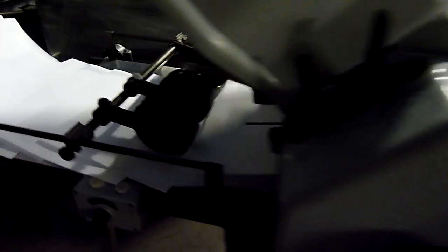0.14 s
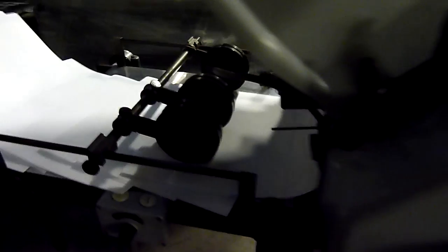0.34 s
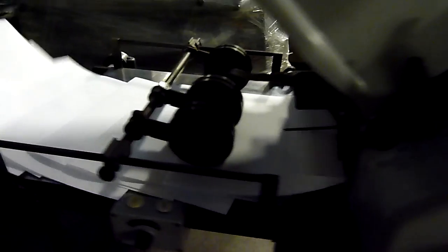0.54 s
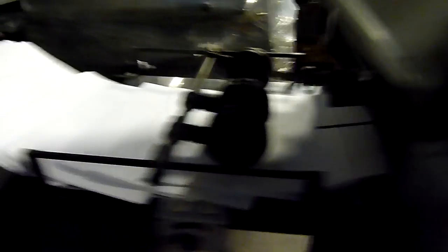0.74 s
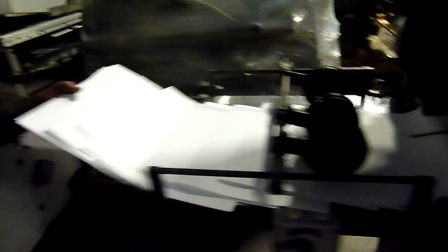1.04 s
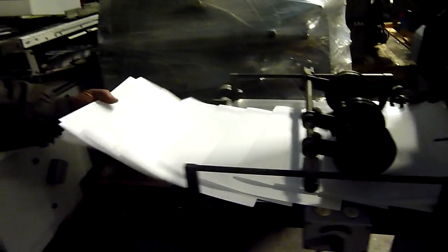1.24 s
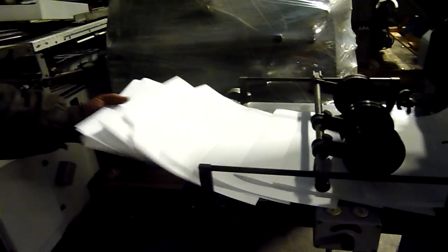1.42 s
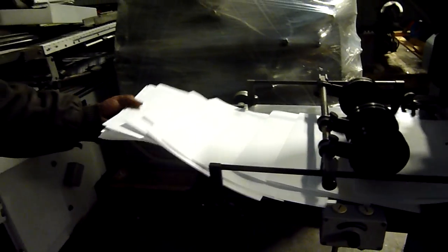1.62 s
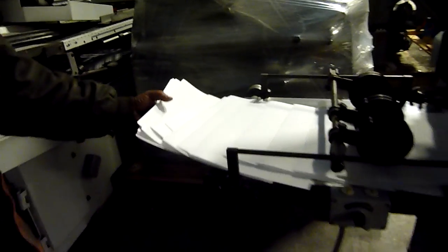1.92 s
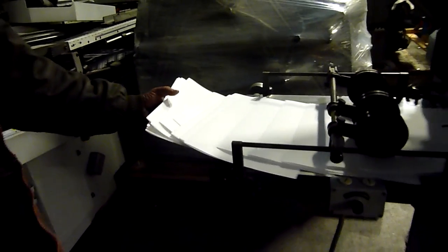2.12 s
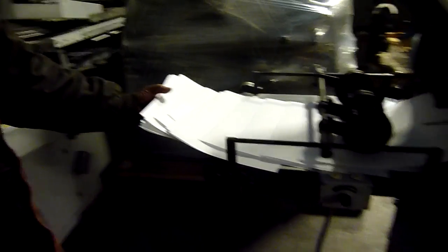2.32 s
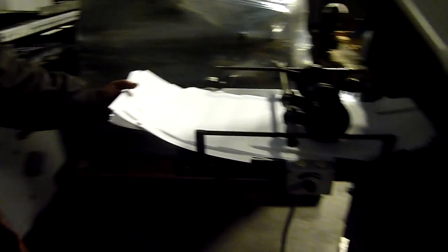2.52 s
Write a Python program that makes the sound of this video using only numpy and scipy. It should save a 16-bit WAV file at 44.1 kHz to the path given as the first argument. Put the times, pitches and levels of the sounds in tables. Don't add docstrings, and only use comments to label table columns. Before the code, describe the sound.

Close up in a workshop, a sheet-feeding folder drones and whirs with rushing air, faint hose whistles and a thin high whine; crisp paper slaps with dull table thuds recur every half second as the listener moves.

```python
import sys
import numpy as np
from scipy import signal
from scipy.fft import rfft, irfft
from scipy.io import wavfile
from scipy.ndimage import uniform_filter1d

SR = 44100
rng = np.random.default_rng(int(sys.argv[2]) if len(sys.argv) > 2 else 0)


def voltage_ratio(decibels):
    exponent = np.asarray(decibels, float) / 20
    return 10 ** exponent


def put_to_file(sound):
    columns = np.atleast_2d(sound).T
    safe = np.clip(columns, -1, 1)
    whole_steps = np.round(safe * 32767)
    wavfile.write(sys.argv[1], SR, whole_steps.astype(np.int16))


N = 117306

SHAFT_HZ, VANES = 24.168, 7
TURN_START_S = .008
MUFFLER_ORDER, MUFFLER_BEND_RAD = 14, -.55
# shaft order, level at start in dB, level at end in dB,
# wander in dB.
HUM_ORDERS = [(6, -55, -58, 2), (7, -41, -41, 1), (11, -39, -49, 1), (13, -30, -49, 1),
              (15, -32, -31.5, .5), (16, -32, -46, 1.5), (20, -35, -44, 1.5), (21, -47, -38, 2),
              (22, -36, -46, 2), (23, -36.5, -40, 1.5), (24, -45, -46, 2), (28, -36, -31.5, 1.5),
              (29, -47, -37, 2), (42, -46, -44, 2), (49, -55, -43, 1.5)]
# time in seconds, level in dB.
PUMP_LOAD = [(0.1, -21.5), (0.48, -22), (0.75, -19), (1.01, -21), (1.37, -21), (1.43, -25.5), (1.55, -19.5),
             (1.56, -21.5), (1.85, -22), (2.41, -22), (2.54, -23), (2.6, -23)]
# shaft order, middle in seconds,
# half length in seconds, level in dB.
ROOM_SWELLS = [
    (42, 1.13, .28, -36),
    (42, 1.66, .1, -40),
    (28, .68, .2, -41),
    (21, 1.3, .5, -43),
    (71, .5, .15, -43),
    (49, 2.5, .12, -43),
    (49, 1.25, .15, -45),
]
# multiple of the vane rate, level in dB.
VANE_WHINE = [(44, -53), (47, -52), (48, -46), (49, -54), (50, -47), (51, -48), (52, -44), (53, -51),
              (54, -52), (55, -57), (56, -53), (61, -58), (62, -54)]
WHINE_DB, WHINE_WANDER_DB, WHINE_PAN_DB, WHINE_BLUR_RAD = -2, 1.8, -1.5, 1.2
# start in seconds, crack in dB,
# ring pitch in Hz, ring in dB, thud in dB.
SHEET_SLAPS = [(.299, -20, 4600, -22, -18), (.338, -26, 3000, -26, -20), (.804, -25, 2200, -24, -22),
               (.8385, -24, 3300, -12, -20), (.8425, -23, 3550, -11, -20), (.8455, -29, 2450, -16, -30),
               (1.032, -30, 3750, -12, -30), (1.3825, -22, 1950, -13, -18), (1.3845, -24, 3750, -15, -30),
               (1.419, -24, 2000, -16, -22), (1.9152, -22, 3550, -11, -24), (1.950, -23, 2900, -15, -24),
               (2.450, -27, 3500, -19, -24), (2.4552, -22, 3750, -7, -26), (2.4556, -30, 4250, -10, -30),
               (2.645, -23, 4700, -18, -22)]
SLAP_T60_S, RING_T60_S, RING_RISE_S, THUD_HZ, THUD_T60_S = .03, .011, .0012, 380, .04
# time in seconds, peak in dB.
FOLD_SNAPS = [
    (.2985, -9),
    (.8055, -14),
    (.8425, -12),
    (1.3832, -7),
    (1.3842, -8),
    (1.4195, -12),
    (1.9168, -10),
    (1.9185, -15),
    (1.9516, -9),
]
# start in seconds, peak in dB, pitch in Hz.
TABLE_BOOMS = [(.06, -25, 165), (.335, -27, 150), (.86, -26, 160), (1.42, -25, 190), (1.465, -26, 200),
               (1.68, -29, 180), (1.95, -19, 185), (1.982, -23, 165), (2.015, -26, 180), (2.49, -27, 160),
               (.8335, -17, 520), (1.9147, -13, 400), (1.9493, -17, 380)]
BOOM_CYCLES, BOOM_RISE_CYCLES = 18, 1
# frequency in Hz, density in dB per Hz.
AIR_SPECTRUM = [(900, -8.5), (1500, -10.5), (2500, -10), (4500, -10), (6500, -8.5), (8000, -11.5),
                (10000, -12), (19000, -23.5)]
AIR_DB = -22.5
# time in seconds, rush change in dB, whine change in dB.
AIR_FLOW = [(0, 1.5, 9), (.35, .5, -11), (.55, 0.3, 8.5), (.85, 1.2, 0), (1.1, -.5, 6), (1.3, 0, 7),
            (1.7, -.5, 9), (2.0, 0, 7.5), (2.2, 0, 8), (2.66, 0.6, 11)]
FIRST_SHEET_S, SHEET_S = .305, .538
SWISH_DB, SWISH_LEAD_S, SWISH_WIDTH_S = 1.1, 0.022, 0.054
# middle in seconds, half length in seconds, frequency in Hz, width in Hz, level in dB.
NOZZLE_JETS = [
    (.17, .35, 5000, 250, -33),
    (.1, .25, 7000, 500, -37),
    (.68, .25, 6000, 300, -33),
    (.9, .5, 5100, 300, -37),
    (1.42, .3, 6000, 250, -34),
    (2.22, .25, 6500, 500, -31),
    (2.62, .1, 6300, 600, -34),
    (1.95, .5, 5400, 300, -39),
    (.55, .2, 1705, 14, -41),
    (2.3, .3, 10500, 2500, -44),
]
# frequency in Hz, width in Hz, level in dB, share of the gusts' swing from 0 to 1.
HOSE_WHISTLES = [(860, 50, -41.5, 0.46), (743.6, 27, -37, 0.1), (202, 29, -44, 0), (1725, 57, -43, 0.15),
                 (294.2, 18, -39, 0)]
HOSE_REF_DB = -32
EVEN_S = .045
# middle in seconds, half length in seconds,
# pitch in Hz, level in dB.
HOSE_GUSTS = [(.07, 0.023, 865.6, -29.5), (0.169, 0.038, 864.4, -29), (0.254, 0.034, 839, -36),
              (0.359, 0.018, 850, -23), (0.489, 0.041, 874, -32.5), (.63, 0.042, 855, -31.5),
              (.77, 0.061, 873.5, -35), (0.863, .045, 845, -30), (0.967, 0.022, 853.6, -38),
              (1.047, .025, 862, -28.5), (1.094, 0.011, 860, -33), (1.16, 0.021, 852, -45),
              (1.24, 0.032, 860, -38), (1.378, 0.022, 848, -32), (1.455, 0.024, 857, -24.5),
              (1.55, 0.039, 853.6, -33), (1.718, 0.046, 867, -37), (1.973, 0.034, 845.5, -37),
              (2.049, 0.031, 854, -27.5), (2.113, 0.023, 864, -29.5), (2.22, 0.02, 866, -31.5),
              (2.33, 0.041, 866, -36), (2.452, .05, 840.4, -38), (2.53, .025, 859, -39),
              (2.602, 0.029, 870.5, -38)]
GUST_OCTAVE_DB, GUST_FLUTTER_RAD = -18, .5
# frequency in Hz, density in dB per Hz.
RUMBLE_SPECTRUM = [(25, -47), (100, -21), (165, -13.5), (255, -10), (420, -7), (700, -5.5), (1000, -13.5),
                   (1500, -24)]
RUMBLE_DB, VANE_PULSE = -27, 0.21
# frequency in Hz, left-right likeness from 0 to 1.
PORT_LIKENESS = [(30, 0.6), (60, 0.77), (130, 1), (300, 0.99), (640, 1), (1400, 0.97), (3000, 0.52),
                 (5500, 0.6), (12000, 0.58)]
# frequency in Hz, lead of the left in radians.
PORT_LEAD = [(30, 0), (2000, .1), (3500, -.9), (5500, -1.6), (8500, -1.4), (11000, -2.7), (15600, -3.1)]
# frequency in Hz, left minus right in dB.
PORT_LEAN = [(60, 1.9), (200, 1.2), (380, .6), (700, .2), (1290, -3.8), (2380, -6.3), (5000, -7.8),
             (8500, -3), (15000, -1.9)]


def shaft():
    return 2 * np.pi * SHAFT_HZ * (np.arange(N) / SR - TURN_START_S)


def pump():
    t = np.arange(N) / SR
    out = voltage_ratio(in_time(PUMP_LOAD)[0]) * np.cos(MUFFLER_ORDER * shaft())
    for order, first_db, last_db, wander_db in HUM_ORDERS:
        level = voltage_ratio(first_db + (last_db - first_db) * t / t[-1] + wander_db * drift(3.0))
        for swell_order, middle_s, half_s, db in ROOM_SWELLS:
            if swell_order == order:
                level = level + voltage_ratio(db) * bell(t - middle_s, half_s) ** 2
        bend = MUFFLER_BEND_RAD * np.clip(order - MUFFLER_ORDER, -1.5, 2) ** 2
        jitter = .12 * (order / MUFFLER_ORDER) ** 2 * drift(2.5)
        out += level * np.cos(order * shaft() + bend + jitter)
    return np.sqrt(2) * out


def whine():
    out = np.zeros((2, N))
    for multiple, db in VANE_WHINE:
        for side in (0, 1):
            start = rng.uniform(0, 2 * np.pi)
            turn = multiple * VANES * shaft() + start + WHINE_BLUR_RAD * drift(3.8)
            out[side] += voltage_ratio(db + WHINE_WANDER_DB * drift(4.5)) * np.cos(turn)
    pan = voltage_ratio([[WHINE_PAN_DB], [-WHINE_PAN_DB]])
    return np.sqrt(2) * out * pan * voltage_ratio(WHINE_DB + in_time(AIR_FLOW)[1])


def slaps():
    out, t = np.zeros((2, N + SR)), np.arange(3000) / SR
    rise = (t / RING_RISE_S) ** 2 / (1 + (t / RING_RISE_S) ** 2)
    slap_decay, ring_decay, thud_decay = [voltage_ratio(-60 * t / t60) for t60 in (SLAP_T60_S, RING_T60_S, THUD_T60_S)]
    crack_band = signal.butter(2, [800, 5600], "band", fs=SR, output="sos")
    thud_band = signal.butter(2, [THUD_HZ / 2, THUD_HZ * 2], "band", fs=SR, output="sos")
    for s, crack_db, ring_hz, ring_db, thud_db in SHEET_SLAPS:
        noise = rng.standard_normal((2, 2, len(t)))
        crack = 2 * voltage_ratio(crack_db) * rms_one(signal.sosfilt(crack_band, noise[0])) * slap_decay * rise
        ring = 2 * voltage_ratio(ring_db) * np.sin(2 * np.pi * ring_hz * t) * ring_decay * rise
        thud = signal.sosfilt(thud_band, noise[1] * thud_decay)
        thud = voltage_ratio(thud_db) * thud / np.abs(thud).max(axis=1, keepdims=True)
        i = int(s * SR)
        out[:, i:i + len(t)] += crack + ring + thud
    return out[:, :N]


def knocks():
    pulses, booms, t = np.zeros(N), np.zeros(N + SR), np.arange(6000) / SR
    for k, (s, db) in enumerate(FOLD_SNAPS):
        sign = 1 if k == 4 else -1
        pulses[int(s * SR)] = sign * voltage_ratio(db) * 3.5
    for s, db, hz in TABLE_BOOMS:
        decay = voltage_ratio(db - 60 * t * hz / BOOM_CYCLES)
        rise = 1 - np.exp(-t * hz / BOOM_RISE_CYCLES)
        i = int(s * SR)
        booms[i:i + len(t)] += 2 * decay * rise * np.sin(2 * np.pi * hz * t)
    snap_band = signal.butter(2, [450, 4500], "band", fs=SR, output="sos")
    return booms[:N] + signal.sosfilt(snap_band, pulses + 1e-18)


def air():
    t = np.arange(N) / SR
    sheet = (t - FIRST_SHEET_S + SWISH_LEAD_S + SHEET_S / 2) % SHEET_S - SHEET_S / 2
    rush_db = AIR_DB + in_time(AIR_FLOW)[0] + SWISH_DB * bell(sheet, SWISH_WIDTH_S)
    out = banded(AIR_SPECTRUM, patchy_db=0.9, shared_db=0.83, fast_hz=12.3) * voltage_ratio(rush_db)
    gust_db, whistle = gusts()
    out = out + whistle
    for middle_s, half_s, hz, width_hz, db in NOZZLE_JETS:
        out = out + narrow(hz, width_hz) * voltage_ratio(db) * bell(t - middle_s, half_s) ** 2
    for hz, width_hz, db, follows in HOSE_WHISTLES:
        tone = evened(narrow(hz, width_hz), .5 + follows / 2)
        out = out + tone * voltage_ratio(db + follows * (gust_db - HOSE_REF_DB))
    return out


def gusts():
    t = np.arange(N) / SR
    level = voltage_ratio(-38) + sum(voltage_ratio(db) * bell(t - s, half_s) ** 2 for s, half_s, _, db in HOSE_GUSTS)
    s, _, hz, _ = np.transpose(HOSE_GUSTS)
    turn = 2 * np.pi * np.cumsum(np.interp(t, s, hz)) / SR + GUST_FLUTTER_RAD * drift(12)
    tone = np.cos(turn) + voltage_ratio(GUST_OCTAVE_DB) * np.cos(2 * turn)
    return 20 * np.log10(level), np.sqrt(2) * level * tone


def rumble():
    noise = banded(RUMBLE_SPECTRUM, patchy_db=2.46, shared_db=0.0, fast_hz=15)
    return noise * voltage_ratio(RUMBLE_DB) * (1 + VANE_PULSE * np.cos(VANES * shaft()))


def banded(spectrum, patchy_db, shared_db, fast_hz):
    out, together = 0, drift(fast_hz)
    edges = 22 * 2 ** np.arange(0, 9.7, 1 / 3)
    white = rng.standard_normal((2, 2, N))
    for k, (low, high) in enumerate(zip(edges, edges[1:])):
        hz = np.sqrt(low * high)
        if spectrum[0][0] < hz < spectrum[-1][0]:
            band_pass = signal.butter(2, [low, high], "band", fs=SR, output="sos")
            band = signal.sosfilt(band_pass, white[k % 2])
            out = out + band * voltage_ratio(at_hz(spectrum, hz) + patchy_db * drift(0.72) + shared_db * together)
    return rms_one(out)


def narrow(hz, width_hz):
    r, x = np.exp(-np.pi * width_hz / SR), rng.standard_normal((2, N + 9000))
    for _ in (0, 1):
        x = signal.lfilter([1, 0, -1], [1, -2 * r * np.cos(2 * np.pi * hz / SR), r * r], x)
    return rms_one(x[:, 9000:])


def evened(x, share):
    level = np.sqrt(uniform_filter1d(x ** 2, size=int(EVEN_S * SR)) + .05)
    return rms_one(x / level ** np.clip(share, 0, 1))


def drift(rate):
    r = np.exp(-80 * np.pi * rate / SR)
    slow = signal.lfilter([1], [1, -2 * r, r * r], rng.standard_normal(N // 40 + 2002))[2000:]
    return np.interp(np.arange(N) / 40, np.arange(len(slow)), rms_one(slow))


def bell(s, width):
    return np.exp(-.5 * (s / width) ** 2)


def rms_one(x):
    return x / np.sqrt(np.mean(np.abs(x) ** 2) + 1e-20)


def in_time(rows):
    s, *columns = np.transpose(rows)
    return [np.interp(np.arange(N) / SR, s, c) for c in columns]


def at_hz(points, hz):
    table_hz, values = np.transpose(points)
    return np.interp(np.log(hz + 1e-9), np.log(table_hz), values)


def ports(near, other):
    hz = np.arange(N // 2 + 1) * SR / N
    alike = np.clip(at_hz(PORT_LIKENESS, hz), 0, 1)
    lean = voltage_ratio(at_hz(PORT_LEAN, hz) / 2)
    right = rfft(near)
    left = alike * np.exp(1j * at_hz(PORT_LEAD, hz)) * right + np.sqrt(1 - alike ** 2) * rfft(other)
    return irfft([left * lean, right / lean], N)


def scene():
    near, other = air() + rumble() + slaps()
    knock = knocks()
    return ports(near + pump() + knock, other + knock) + whine()


def top_cut(x):
    return signal.sosfilt(signal.butter(12, 15740, fs=SR, output="sos"), x)


def record(dry):
    low_pass = signal.ellip(12, .5, 70, 15720, fs=SR, output="sos")
    return top_cut(signal.sosfilt(low_pass, dry))


dry = scene()
out = record(dry)
put_to_file(out)
```